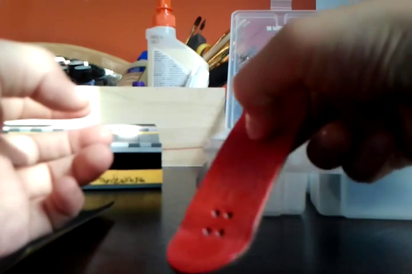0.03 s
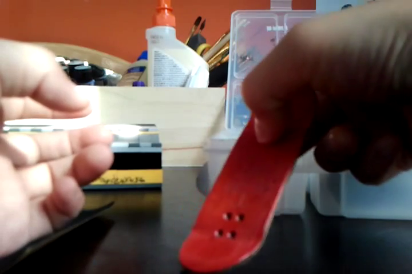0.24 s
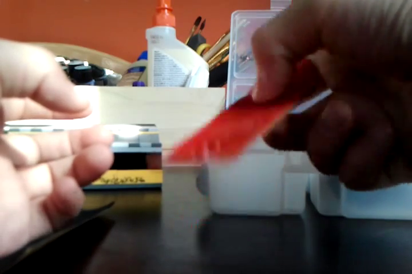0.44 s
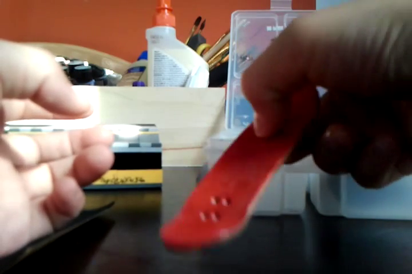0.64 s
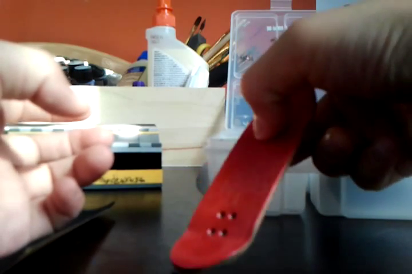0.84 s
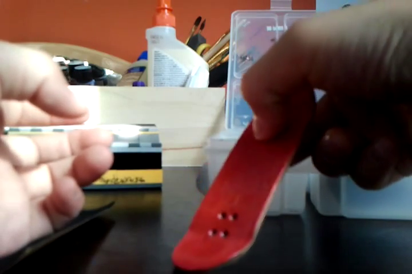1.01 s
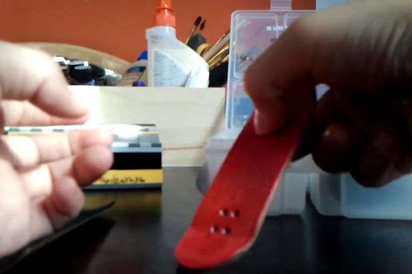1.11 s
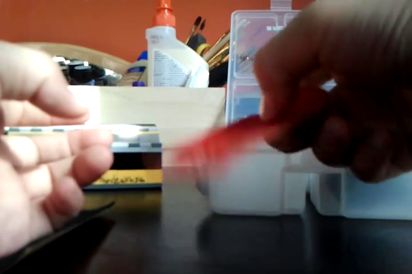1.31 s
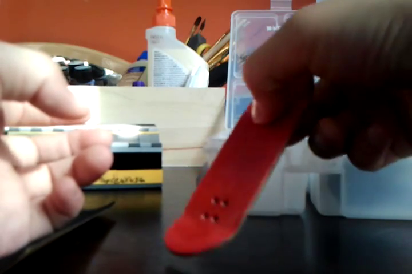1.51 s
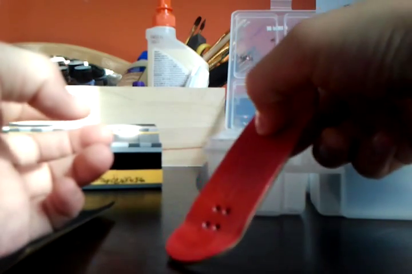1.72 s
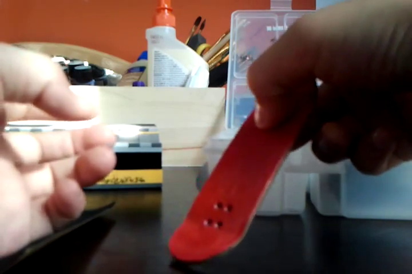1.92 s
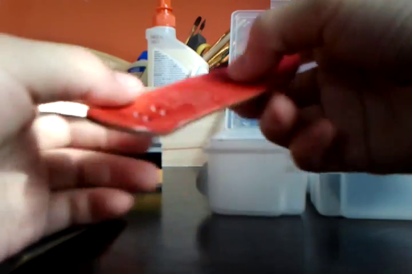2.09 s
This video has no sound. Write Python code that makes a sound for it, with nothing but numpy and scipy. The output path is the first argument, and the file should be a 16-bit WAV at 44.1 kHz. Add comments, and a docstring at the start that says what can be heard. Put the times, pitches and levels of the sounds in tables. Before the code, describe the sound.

Sharp, dry wooden clacks of a hand-held miniature skateboard deck against a tabletop, in three runs that speed up and fade into a tiny flutter; close microphone, short indoor reverberation, quiet low rumble beneath.

```python
"""Fingerboard deck popped on a desk

A small wooden fingerboard deck is popped three times on a desk, close to a small microphone; each time
its tail bounces ever faster and softer until it settles. An earlier contact is dying away at the start.
Each contact rings decaying modes of deck and desk, with noise-like reflections from clutter and room.
Under it lie filtered noise for hiss and for a low, swelling rumble, and sines for mains hum."""
import sys
import numpy as np
from scipy import signal
from scipy.fft import rfft, irfft
from scipy.io import wavfile

SR = 44100
rng = np.random.default_rng(int(sys.argv[2]) if len(sys.argv) > 2 else 0)


def materialize(psi):
    """Save the field psi as 16-bit PCM at rate SR to the path in sys.argv[1].

    A 1-D psi becomes a single channel; in a 2-D psi each row is a channel.
    """
    bounded = np.clip(np.atleast_2d(psi).T, -1, 1)
    quanta = np.round(bounded * 32767).astype(np.int16)
    wavfile.write(sys.argv[1], SR, quanta)


N = 94815
RING_T = np.arange(SR * 3 // 4) / SR  # time axis of one contact, s


def amp(db):
    """Decibels to gain."""
    return 10 ** (np.asarray(db) / 20)


def evened(x):
    """Scales to rms 1."""
    return x / np.sqrt(np.mean(x ** 2) + 1e-20)


def read(points, hz):
    """Reads a table on a log-frequency axis."""
    f, value = np.transpose(points)
    return np.interp(np.log(hz + 1), np.log(f + 1), value)


def coloured(x, points, size=4096):
    """Causal minimum-phase filter whose gain follows a (f/Hz, level/dB) table."""
    hz = abs(np.fft.fftfreq(size, 1 / SR))
    log_gain = np.log(amp(read(points, hz)))
    # the Hilbert transform of the log gain gives the minimum phase
    response = np.exp(np.conj(signal.hilbert(log_gain)))
    taps = np.fft.ifft(response).real[:size // 2]
    return signal.fftconvolve(x, taps)[:len(x)]


def noise(points):
    """Steady noise of rms 1 with the given spectrum."""
    white = rfft(rng.standard_normal(N))
    gain = amp(read(points, np.fft.rfftfreq(N, 1 / SR)))
    return evened(irfft(white * gain, N))


def add(mix, s, sound):
    """Mixes a sound in at time s, cutting whatever falls outside the mix."""
    start = round(s * SR)
    sound = sound[max(-start, 0):]
    part = mix[max(start, 0):][:len(sound)]
    part += sound[:len(part)]


def ring(pitches, modes, rise_s, uneven_db=0):
    """Dying sines that build up over rise_s, each mode a little stronger or weaker by chance."""
    chance = uneven_db * rng.standard_normal(len(modes))
    swing = np.zeros(len(RING_T))
    for hz, (db, t60), offset_db in zip(pitches, modes, chance):
        decay = amp(db + offset_db - 60 * RING_T / t60)
        swing += decay * np.sin(2 * np.pi * hz * RING_T)
    return swing * (1 - np.exp(-(RING_T / rise_s) ** 2))


def echoes(colour, decay, delay_s, rise_s, size=12):
    """Sparse reflections of random sign and energy 1, each band dying at its own speed."""
    taps = np.zeros(len(RING_T))
    # one reflection at a random place in every slot of `size` samples
    slots = np.arange(0, len(RING_T) - size, size)
    taps[slots + rng.integers(0, size, len(slots))] = rng.choice([-1, 1], len(slots))
    hz, t, bands = signal.stft(taps, SR, nperseg=256)
    fade = amp(-60 * t / read(decay, hz)[:, None])
    tail = signal.istft(bands * fade, SR, nperseg=256)[1][:len(RING_T)]
    onset = np.clip((RING_T - delay_s) / rise_s, 0, 1)
    tail = coloured(tail * onset, colour)
    return tail / np.linalg.norm(tail)


def deck_crack():
    """The hand-damped deck: short wooden modes, drawn slightly uneven for each landing spot."""
    # mode pitches (f/Hz)
    deck_hz = [880, 2150, 2950, 3480, 4080, 4600, 5330, 5540, 5960, 6790, 7750, 8230, 9100]
    # the same modes (relative level/dB, t60/s)
    deck_modes = [(-16.5, 0.019), (-17.5, 0.014), (-24, 0.036), (-50, 0.0072), (-8.5, 0.015), (-10, .012),
                  (-3.5, .012), (-3, 0.011), (-11.5, 0.013), (-15.5, 0.014), (-20, 0.016), (-25, 0.018),
                  (-33, 0.0076)]
    return amp(5) * ring(deck_hz, deck_modes, rise_s=.00078, uneven_db=1)


def wall_reflections(crack):
    """Single reflections off nearby boards and walls: delayed, duller copies of the crack."""
    # arrivals (delay t/s, relative level/dB)
    walls = [(.0052, -9), (.0135, -13), (.0172, -8)]
    # their dull colour (f/Hz, level/dB)
    wall_colour = [(200, -6.5), (420, 4.5), (580, 11), (780, 5.5), (1050, -2.5), (2100, -2), (4000, -12.5),
                   (8000, -10.5)]
    dull = coloured(crack, wall_colour)
    out = np.zeros(len(crack))
    for delay_s, db in walls:
        add(out, delay_s, amp(db) * dull)
    return out


def clutter_scatter():
    """Dense early reflections from the clutter on the desk."""
    # spectrum (f/Hz, relative level/dB per Hz)
    clutter = [(100, -17), (330, -17.5), (550, 0.5), (950, -5), (1350, -11), (2100, -1.5), (2750, -10),
               (3500, -2), (4100, -3), (4750, 2.5), (5300, -5.5), (6300, -9), (8100, -16.5), (9400, -28)]
    # decay (f/Hz, t60/s)
    clutter_t60 = [(500, 0.11), (2000, 0.059), (5000, 0.029), (8000, 0.052)]
    return amp(10.5) * echoes(clutter, clutter_t60, delay_s=.0012, rise_s=.001)


def desk_ring():
    """Longer modes of the desk and the things on it."""
    # mode pitches (f/Hz)
    desk_hz = [445, 543, 628, 778, 848, 955, 1095, 1592, 1820, 2095, 2210, 2258, 3104, 3691, 4033, 5004,
               5075, 5454]
    # the same modes (relative level/dB, t60/s)
    desk_modes = [(-7, .14), (-1, .12), (1, .13), (0, .12), (-1, .18), (-1, .14), (-4, .15), (-6, .14),
                  (-2, .11), (-8, .15), (-6, .15), (-3, .16), (-8, .16), (-6, .15), (-4, .13), (-3, .2),
                  (-3, .2), (-2, .16)]
    return amp(-28.5) * ring(desk_hz, desk_modes, rise_s=.0016)


def room_tail():
    """Reverberation of the small room, of energy 1."""
    # spectrum (f/Hz, relative level/dB per Hz)
    room_colour = [(100, -22.5), (300, -6.5), (850, -9), (1400, -9.5), (2200, 7.5), (2800, 1.5),
                   (4100, 3.5), (4650, -2.5), (5200, 4.5), (6300, -4), (8100, -11), (9400, -31.5)]
    # decay (f/Hz, t60/s)
    room_t60 = [(300, 1), (1000, 0.71), (2500, 0.17), (5000, 0.26), (8000, .28)]
    return echoes(room_colour, room_t60, delay_s=.0038, rise_s=.005)


def room_boom():
    """A low room resonance that builds up slowly after each contact."""
    # resonance pitch (f/Hz)
    boom_hz = [298]
    # the same resonance (relative level/dB, t60/s)
    boom_mode = [(-20, .13)]
    return ring(boom_hz, boom_mode, rise_s=.035)


def deck_note(room):
    """The deck's one clear note: two close modes with their own answer from the room."""
    # mode pitches (f/Hz)
    note_hz = [5075, 5200]
    # the same modes (relative level/dB, t60/s)
    note_modes = [(0, .045), (-9, .02)]
    note = amp(-15) * ring(note_hz, note_modes, rise_s=.0016)
    tail = signal.fftconvolve(note, room)[:len(note)]
    # the answer is set by energy, relative to the note itself
    tail *= np.linalg.norm(note) / np.linalg.norm(tail)
    return note + amp(-12.5) * tail


def landing_spots(room, count):
    """A few contact sounds: each spot has its own crack and some scatter, and all share one ring."""
    own_share = .25  # part of the scatter energy that is particular to a spot
    shared = desk_ring() + room_boom() + np.sqrt(1 - own_share) * clutter_scatter() + amp(3) * room
    spots = []
    for _ in range(count):
        crack = deck_crack()
        scatter = np.sqrt(own_share) * clutter_scatter()
        spots.append(crack + shared + scatter + wall_reflections(crack))
    return spots


def flutter(count=5):
    """Contacts as the deck comes to rest, ever closer and softer, in the columns of the bounces."""
    # start of each flutter (t/s, relative level/dB of its first contact)
    settles = [(.5178, -39.5), (1.328, -45.5), (2.1085, -45)]
    first_gap_s, gap_shrink, step_db = .008, .8, -2
    contacts = []
    for s, db in settles:
        for k in range(count):
            elapsed_s = first_gap_s * sum(gap_shrink ** j for j in range(k))
            contacts.append((s + elapsed_s, db + step_db * k, 0, -4))
    return contacts


def bounces(spot_count=5):
    """Tail contacts, taking the landing spots in turn, each with its own strength and tilt, plus the note."""
    # contacts of the tail with the desk (t/s, relative level/dB, woody body/dB, bright edge/dB)
    contacts = [(-.035, -22.5, 8.5, -6), (0.2466, 0, -1, -2.5), (.3318, -8, -2.5, -4.5),
                (.3939, -16.5, 0, -3), (0.4452, -21, 0.5, -5), (0.4743, -28, 6, -1.5),
                (.4940, -32.5, 5, -5), (.5085, -36.5, 9, -3), (.9348, -5.5, -0.5, 2),
                (1.0510, -10, -.5, -2), (1.1379, -16, -.5, -1), (1.2036, -20.5, -1, -3.5),
                (1.2561, -27.5, 2, -4), (1.2851, -33.5, 4.5, -3), (1.3040, -39.5, 9, -4),
                (1.3175, -43, -2, -8), (1.7253, -6.5, 0.5, 1), (1.8714, -16, 1.5, 0), (1.9664, -16.5, 0, 0),
                (2.0257, -21, 1, 1), (2.0583, -28.5, 4.5, -3), (2.0813, -36, 6.5, -4),
                (2.0959, -37, 10, -3)]
    body_hz, bite_hz, bright_hz = 2500, 5200, 7500
    note_follow = .82  # dB of note per dB of contact: the note stands out more on light contacts
    room = room_tail()
    spots = landing_spots(room, spot_count)
    note = deck_note(room)
    out = np.zeros(N)
    for k, (s, db, body_db, edge_db) in enumerate(contacts + flutter()):
        tilt = [(body_hz, db + body_db), (bite_hz, db), (bright_hz, db + edge_db)]
        clack = coloured(spots[k % spot_count], tilt)
        # the note goes in with inverted polarity
        add(out, s, clack - amp(note_follow * db) * note)
    return out


def hiss():
    """Steady hiss: noise shaped by a fixed spectrum."""
    # spectrum (f/Hz, relative level/dB per Hz)
    hiss_colour = [(60, -22), (150, -8.5), (200, -5), (300, -12), (390, -15.5), (810, -16), (2200, -23.5),
                   (6750, -28), (8600, -36), (9300, -48), (9900, -66)]
    return amp(-55) * noise(hiss_colour)  # dB rms


def mains_hum():
    """Faint mains hum: steady sines at 60 Hz and some of its harmonics, at random phases."""
    # partials (f/Hz, level/dB rms)
    hum_partials = [(60, -55), (120, -62), (180, -61.5), (300, -64)]
    t = np.arange(N) / SR
    hum = np.zeros(N)
    for hz, db in hum_partials:
        hum += amp(db) * np.sqrt(2) * np.sin(2 * np.pi * (hz * t + rng.random()))
    return hum


def rumble():
    """Low rumble: shaped noise with a wandering level and one marked swell."""
    # spectrum (f/Hz, relative level/dB per Hz)
    rumble_colour = [(5, -12), (20, 3), (45, -7), (80, -10), (140, -16.5), (250, -37), (600, -28),
                     (2000, -63.5)]
    # course of the level (t/s, level/dB rms)
    rumble_level = [(0, -47.5), (.2, -42.5), (.45, -44.5), (.8, -43), (1.14, -46), (1.24, -35),
                    (1.36, -35.5), (1.46, -41.5), (1.55, -43.5), (2.15, -47)]
    level_db = np.interp(np.arange(N) / SR, *np.transpose(rumble_level))
    return amp(level_db) * noise(rumble_colour)


def scene():
    """The bouncing deck, close up, over the quiet of the room."""
    return (bounces() + hiss() + mains_hum() + rumble())[None]


def record(dry):
    """A narrow-band microphone, clipping at full scale, then a wider low-pass as the band limit."""
    mic_edge_hz, band_edge_hz = 9750, 16800
    mic_taps = signal.firwin(127, mic_edge_hz, window=("kaiser", 7), fs=SR)
    mic = signal.oaconvolve(dry, mic_taps[None], "same")
    clipped = np.clip(mic, -1, 1)
    band_taps = signal.firwin(255, band_edge_hz, window=("kaiser", 9), fs=SR)
    return signal.oaconvolve(clipped, band_taps[None], "same")


dry = scene()
out = record(dry)
materialize(out)
```